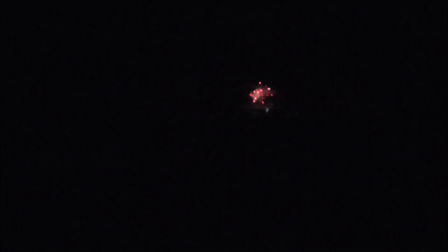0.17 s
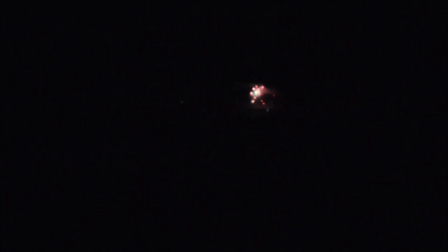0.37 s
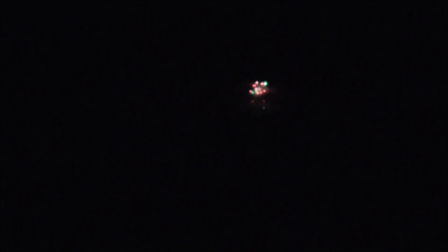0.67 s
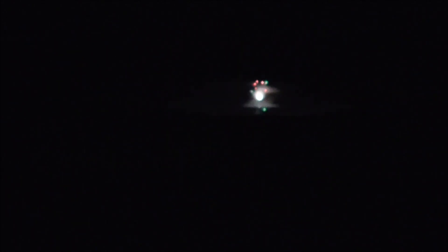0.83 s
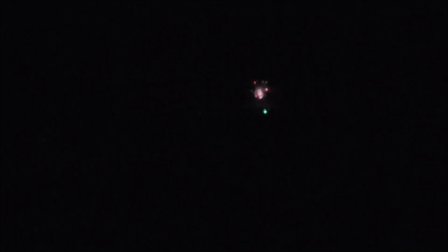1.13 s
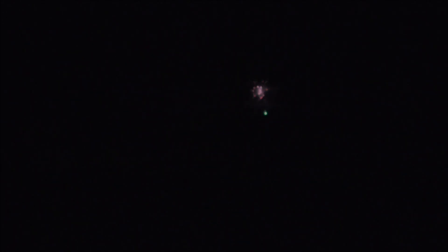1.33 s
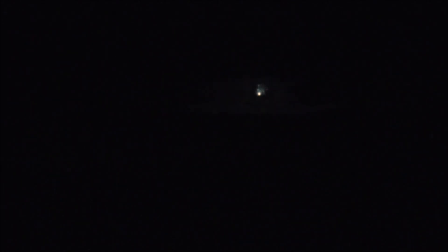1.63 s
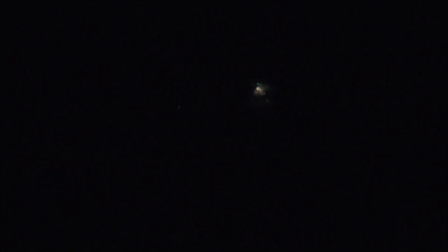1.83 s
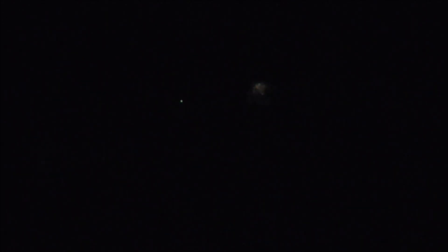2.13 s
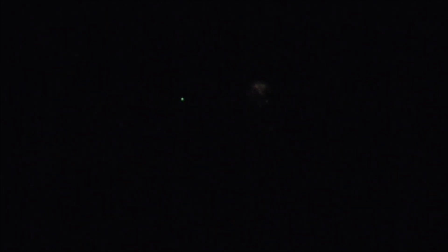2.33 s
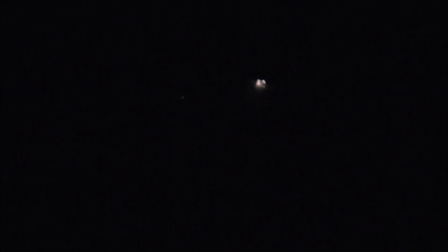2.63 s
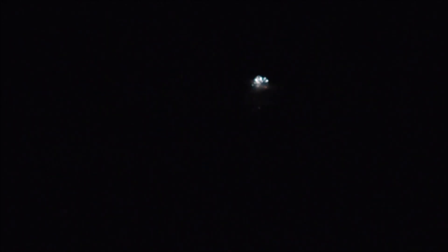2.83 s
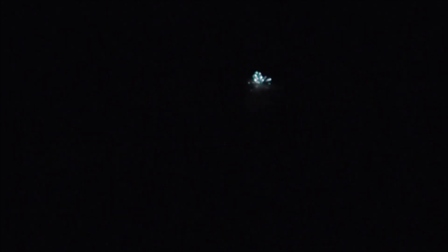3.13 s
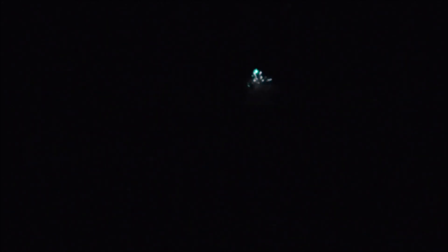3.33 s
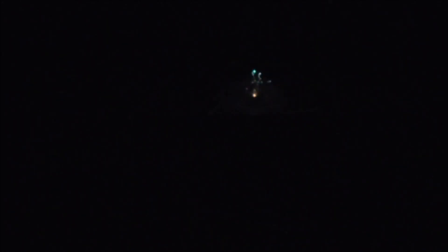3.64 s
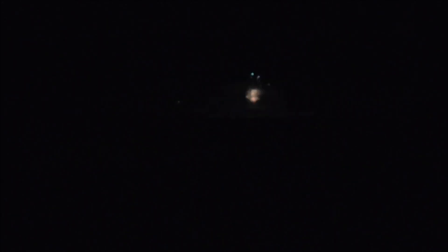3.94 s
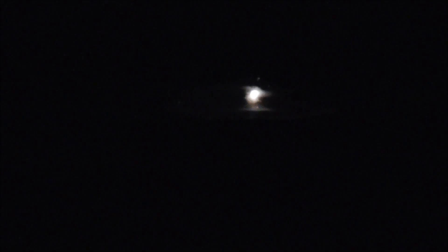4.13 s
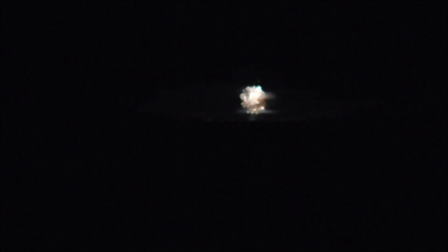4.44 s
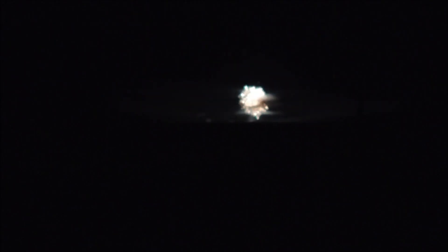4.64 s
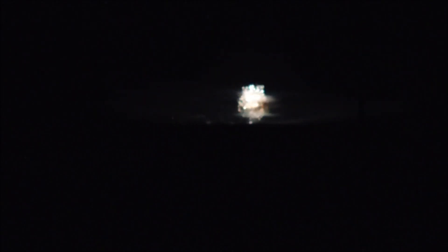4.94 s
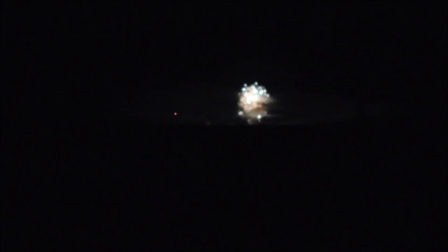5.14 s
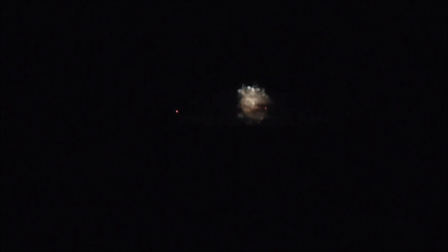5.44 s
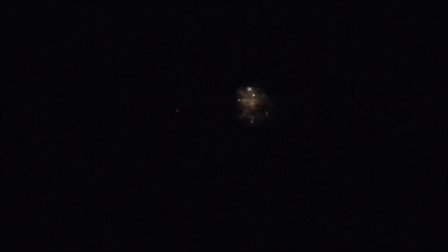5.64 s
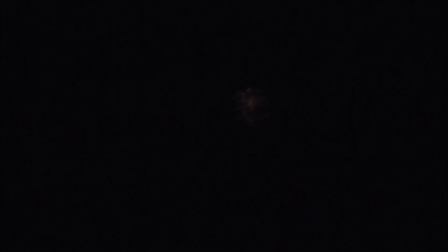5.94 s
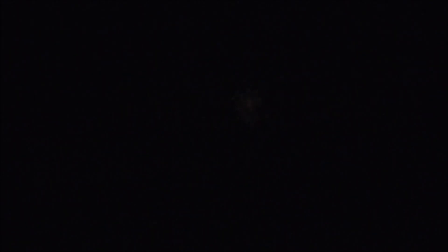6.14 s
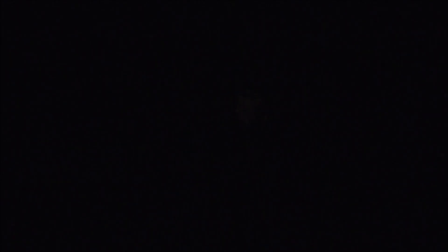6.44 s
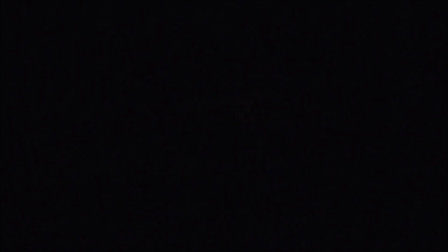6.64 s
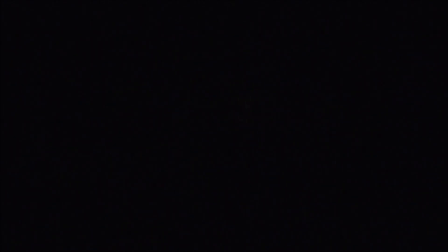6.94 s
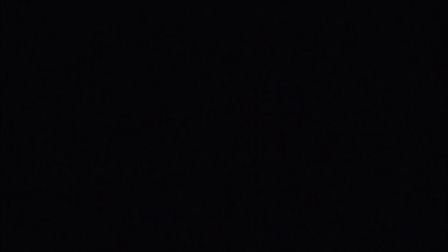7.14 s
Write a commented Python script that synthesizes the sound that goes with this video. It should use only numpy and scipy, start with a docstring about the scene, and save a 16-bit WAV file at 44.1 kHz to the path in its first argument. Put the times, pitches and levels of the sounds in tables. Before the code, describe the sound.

Many far-away fireworks pop and thump in an open night setting. The sound opens straight on a bang, then bursts come singly and in quick flurries, some sharper and a little to one side. A continuous muffled rumble with soft crackling joins them together, dips now and then, and grows fuller toward the close. The small stereo microphone gives thin deep bass, mild limiting and quiet hiss.

```python
"""Outdoors at night, far from a fireworks display, heard through a small stereo camera.
Each burst is a dull thud: a short low pulse with a deeper thump and a thin knock and snap, smeared by scatter.
Random small pops over noise, standing for their echoes, blend into a rumble that swells near the end.
Thin treble ticks ride on loud bangs. The loudest bangs meet a soft ceiling; the recorder's own hiss
sinks after them and creeps back."""
import sys
import numpy as np
from scipy import signal
from scipy.fft import rfft, irfft, next_fast_len
from scipy.io import wavfile
from scipy.ndimage import map_coordinates

SR = 44100
rng = np.random.default_rng(int(sys.argv[2]) if len(sys.argv) > 2 else 0)


def wrap_up_sound(samples):
    """Save the sound to the file named by the first command line argument, as 16-bit audio."""
    columns = np.atleast_2d(samples).T
    # keep every value between -1 and 1, then stretch to whole-number steps
    tamed = np.clip(columns, -1, 1)
    steps = np.round(tamed * 32767).astype(np.int16)
    wavfile.write(sys.argv[1], SR, steps)


N = 321472  # samples in the scene


def amp(db):
    """Decibel law: an amplitude ratio from a level in dB."""
    return 10 ** (np.asarray(db) / 20)


def unit(x):
    """Power normalisation: scale to an rms of 1."""
    return x / np.sqrt(np.mean(x ** 2) + 1e-20)


def along(points, hz):
    """Logarithmic pitch scale: interpolate (Hz, value) points along log frequency."""
    point_hz, values = np.transpose(points)
    return np.interp(np.log(hz + 1), np.log(point_hz + 1), values)


def curves(rows):
    """Envelope interpolation: one value per sample for each column after the time."""
    seconds, *columns = np.transpose(rows)
    return [np.interp(np.arange(N) / SR, seconds, column) for column in columns]


def wobble(rate):
    """Band-limited fluctuation: a smooth random curve with `rate` knots a second."""
    knots = rng.standard_normal(int(N * rate / SR) + 4)
    return map_coordinates(knots, [np.arange(N) * rate / SR])


def filtered(x, response):
    """Linear filtering: multiply the spectrum by a response of frequency."""
    length = next_fast_len(N + SR // 2)  # spare room keeps tails from wrapping round
    spectrum = rfft(x, length) * response(np.fft.rfftfreq(length, 1 / SR))
    return irfft(spectrum, length)[..., :N]


# Correlation of left and right. Each row: frequency in Hz, likeness (1 = identical, no unit).
LIKENESS = [(40, .9), (125, 1), (250, 0.97), (550, 0.89), (900, 0.79), (1600, .75), (2700, 0.21),
            (8000, 0.26)]


def spread(pair, spectrum):
    """Interchannel coherence: colour two signals as mid and side, giving a stereo pair of rms 1."""
    def mid_side_gains(hz):
        angle = np.arccos(np.clip(along(LIKENESS, hz), -1, 1)) / 2
        return amp(along(spectrum, hz)) * [np.cos(angle), np.sin(angle)]

    mid, side = filtered(pair, mid_side_gains)
    return unit(np.array([mid + side, mid - side]))


def pulse(t, hz, width, front):
    """Damped oscillation: swings under a bell centred on t = 0; front < 1 steepens the rise; the pitch sags."""
    u = t / width
    bell = np.exp(-(u / np.where(u < 0, front, 1)) ** 2 / 2)
    return bell * np.cos(2 * np.pi * hz * t * (1 - .06 * np.tanh(u)))


THUMP_DB, THUMP_HZ = -15, 170  # level against the thud
KNOCK_HZ, KNOCK_AFTER_MS = 1080, 0.65  # the knock and snap follow the peak
SNAP_HZ = 2700
GROUND_HZ = 70  # the ground echo cancels the lowest bass

# The single bursts. Each row: time of the peak in seconds, peak level in dB before shadow and bass loss,
# thud pitch in Hz, thud length in ms (two bell widths), knock level in dB (rms of a steady tone) and
# snap peak level in dB (both against the thud, before shadow), lag of left behind right in ms.
BURSTS = [(.003, -2.5, 295, 12, -7, -39, 0.019), (.0455, 4.5, 417, 2.3, -13, -40, .25),
          (0.0749, -1, 463, 2.3, -20.5, -36, .2), (.304, 2.5, 307, 2.3, -22.5, -39.5, 0.032),
          (0.3619, -5.5, 343, 4.2, -22.5, -39, 0.03), (0.3655, 2, 500, 1.2, -24.5, -35.5, 0.012),
          (0.5408, -7.5, 390, 3.5, -27, -61, 0.048), (0.5722, -8, 403, 2.5, -28, -50, 0),
          (.7052, -3.5, 304, 3.5, -18.5, -37, 0.016), (0.782, 2.5, 527, 3.3, -14.5, -28, .23),
          (0.8512, -2.5, 468, 2.1, -24, -55, .23), (1.2489, -4.5, 346, 2.8, -13, -38, 0.064),
          (1.45, -7.5, 445, 1.5, -14, -28, 0.021), (1.4541, 1.5, 239, 3.8, -27.5, -53, 0.067),
          (1.494, -13, 520, 4, -14.5, -50, 0.023), (1.511, -1.5, 330, 2.4, -16, -37, 0.096),
          (1.5171, 2, 404, 0.77, -33, -33.5, 0), (2.0268, 0.2, 384, 1.1, -19.5, -42.5, 0.038),
          (2.06, -8.5, 450, 2.1, -20, -63.5, 0), (2.0837, -6.5, 340, 5.6, -23, -64, 0.046),
          (2.0954, -9, 279, 8, -31, -58, 0.023), (2.1107, 0.5, 273, 3.6, -44, -59, 0.072),
          (2.1147, -4.5, 407, 0.8, -32, -61, 0), (2.1524, 5.5, 405, 1.76, -34, -35, 0.28),
          (2.2136, -6.5, 407, 4.9, -25, -49.5, 0.23), (2.2797, -7, 465, 1.8, -12.5, -29, 0.025),
          (2.3013, -6, 259, 14, -15, -30, 0.026), (2.3632, -6.5, 326, 10, -6, -44, 0.086),
          (2.3674, 2.5, 434, 1.4, -19, -32, 0), (2.429, -3.2, 467, 1.1, -42, -35, 0.08),
          (2.9433, -4, 410, 1.4, -12.5, -32.5, 0.05), (3.1846, -9.5, 410, 3.2, -40, -63.5, 0.029),
          (3.399, -2, 272, 3.85, -11.5, -34, 0.029), (3.4015, -3, 270, 3, -29, -51, 0.085),
          (3.439, 5, 475, 2.9, -11.5, -47, .25), (3.467, -10.5, 322, 2.9, -8, -36, 0),
          (3.473, -1.2, 445, 1.1, -30, -49, 0.032), (3.5178, -4.5, 520, 2.8, -19, -42, .23),
          (3.5616, -5, 440, 1.3, -12.5, -38, 0.022), (4.1685, -2, 490, 1.17, -27, -37.5, 0.043),
          (4.1728, -5, 320, 3.3, -21, -56, 0.091), (4.2237, -5, 380, 1.8, -25, -52, 0),
          (4.242, -5, 322, 2, -21.5, -55, 0), (4.248, 2, 320, 2, -23.5, -41.5, 0.043),
          (4.426, -9.5, 427, 1.7, -26, -52, 0.049), (4.7344, 4.5, 444, 2.4, -7.5, -44.5, 0.24),
          (4.7397, -10.5, 324, 1, -28, -33, 0), (4.817, -5, 460, 2.4, -24, -45, 0.26),
          (4.8283, -6.5, 440, 1.5, -11.5, -29, 0.0066), (4.8809, -2.9, 387, 1.2, -13.5, -27.5, 0.031),
          (4.9068, -6.5, 428, 2.1, -8.5, -47, 0.023), (4.9804, -2.5, 418, 0.57, -17.5, -27, 0.009),
          (4.9979, -2, 403, 1.8, -18, -39, 0), (5.0045, -8.5, 315, 5.9, -15, -46, 0.086),
          (5.005, -15, 410, 2.1, -3, -43, 0.022), (5.028, -5.5, 426, 0.7, -20, -52, 0),
          (5.066, -14, 470, 4.3, -18, -48, 0), (5.103, -6, 345, 2, -10.5, -33, 0.023),
          (5.1357, -4.5, 381, 3.8, -10, -42, 0), (5.154, -4, 450, 1, -16.5, -51, 0),
          (5.1887, -8.5, 350, 2.5, -8.5, -52.5, 0.013), (5.3196, -12, 400, 1.4, -23, -57, 0.059),
          (5.7106, -13.5, 430, 2.5, -29, -58.5, 0.076), (5.7575, -9.5, 428, 3.3, -36, -58, 0.056),
          (5.9582, -8.5, 380, 5, -32, -54, 0.075), (6.127, -1.5, 450, 1.5, -19, -38, 0),
          (6.1315, -2.5, 488, 0.76, -34, -53, 0), (6.1724, 0, 440, 1.2, -21, -46, 0.024),
          (6.182, -2, 241, 5.3, -30, -52, 0.028), (6.1999, -6.5, 308, 2.9, -17.5, -61, 0.051),
          (6.206, -0.5, 554, 1.5, -19.5, -49, 0.038), (6.227, -5, 260, 5.8, -24, -52, 0),
          (6.241, -7, 310, 2.8, -14, -53, 0.015), (6.2484, -2, 366, 2.8, -22, -53, 0),
          (6.282, -3, 403, 1.4, -25, -56, 0.076), (6.2899, -5.5, 300, 3.6, -31, -53, 0.035),
          (6.3254, -3.5, 313, 4.9, -14, -37.5, 0), (6.363, -4, 440, 1.4, -13, -37, 0),
          (6.3858, -4.5, 333, 4.7, -8, -28, 0.036), (6.3929, 2.3, 420, 1.2, -25, -36, 0),
          (6.4658, -4.5, 470, 0.88, -26, -41, 0), (6.4721, -1, 400, 1.1, -19, -44, 0),
          (6.5415, -6, 318, 3, -14, -51, 0.025), (6.5451, -0.5, 385, 2.2, -30, -36, 0.03),
          (6.6399, -4, 430, 1.3, -16.5, -37, 0.013), (6.7024, -2.5, 336, 1.9, -21, -40, 0),
          (6.727, -7.5, 503, 2.2, -21, -58, 0), (6.7521, 0.5, 419, 1.2, -20, -37.5, 0),
          (6.7648, -7.5, 518, 2.1, -31.5, -53, 0.054), (6.895, -12.5, 480, 21, -21, -56, 0.039),
          (6.9248, -15.5, 437, 1.6, -15, -49, 0), (6.965, -6.5, 407, 1.2, -23, -53, 0),
          (7.027, -9, 372, 3.3, -18.5, -54, 0), (7.0417, -10, 355, 1.1, -19, -44, 0),
          (7.1468, -22, 476, 1.8, -25, -41, 0.031), (7.2344, -9, 516, 5.7, -29, -35.5, 0)]


def bangs():
    """Superposition of pulses and multipath scattering: thud, thump, knock and snap blurred by scattered paths."""
    lead = SR // 50  # samples kept before each peak
    t = (np.arange(3 * lead) - lead) / SR
    out = np.zeros((2, N + SR))
    scatter_noise = rng.standard_normal((len(BURSTS), len(t)))
    for row, noise in zip(BURSTS, scatter_noise):
        s, db, hz, ms, knock_db, snap_db, lag_ms = row
        # the far port hears it later and weaker, most of all in the treble
        at = t - np.array([[1], [-1]]) * lag_ms / 2000
        shadow_db = np.array([[-1], [1]]) * 3.5 * lag_ms
        near = abs(lag_ms) > .12  # the launchers at the side start abruptly
        front = .55 if near else .9

        thud = -pulse(at, hz, .5 * ms / 1000, front)
        thump = amp(THUMP_DB) * pulse(at, THUMP_HZ, 0.0052, 0.53)
        edge = at - KNOCK_AFTER_MS / 1000
        knock = -amp(knock_db + shadow_db) * np.sqrt(2) * pulse(edge, KNOCK_HZ, .0004, .9)
        snap = -amp(snap_db + 4 * shadow_db) * pulse(edge, SNAP_HZ, 0.00012, .9)

        # seconds for the scatter to fall 60 dB before and after the main path
        smear = np.where(t < 0, .004 if near else .03, .035)
        scatter = amp(-27 - 60 * np.abs(t) / smear) * noise
        scatter[lead] = 1  # the main path
        wave = signal.fftconvolve(thud + thump + knock + snap, scatter[None], axes=1)
        wave = wave[:, lead:][:, :len(t)]
        out[:, round(s * SR):][:, :len(t)] += amp(db + shadow_db) * wave / np.abs(wave).max()
    return filtered(out[:, lead:][:, :N], lambda hz: (1j * hz / (GROUND_HZ + 1j * hz)) ** 2)


SIZZLE_DB, SIZZLE_GROWS = -23.5, 1.15  # against the average crackle; its swings in dB over the crackle's

# Spectra of the rumble, low to high. Each row: frequency in Hz, relative level in dB per Hz.
BODY = [(15, -50), (25, -26.5), (45, -21), (100, -16), (170, -9.5), (240, 0.5), (340, -1), (560, -1),
        (700, -6.5), (870, -16.5), (1300, -40), (2000, -120)]
CRACKLE = [(400, -120), (700, -9.5), (900, 3), (1300, 0.5), (1600, -14), (2000, -43.5), (3000, -120)]
SIZZLE = [(1000, -120), (1500, -9), (1900, 9.5), (2300, 1), (3000, -11.5), (4500, -38), (7000, -120)]
# Envelope of the rumble. Each row: time in seconds, body level in dB, crackle level in dB, before the surge.
RUMBLE = [(0.0, -22.5, -38.5), (0.49, -21, -37.5), (1.28, -27, -44), (1.72, -20, -37.5),
          (2.05, -21.5, -41.5), (2.21, -21.5, -36.5), (2.39, -21.5, -37.5), (3.37, -25.5, -45),
          (3.55, -23.5, -40), (4.16, -27, -43.5), (4.32, -18.5, -36.5), (4.73, -26.5, -44),
          (5.07, -23.5, -39), (5.46, -24.5, -40), (5.95, -26, -47.5), (6.17, -22.5, -41.5),
          (6.31, -14, -32.5), (6.64, -20, -36.5), (6.96, -15.5, -31.5), (7.29, -20, -32)]


def barrage():
    """Shot noise in a diffuse field: one stream of random pops over a wash of echoes drives three colours."""
    body_db, crackle_db = curves(RUMBLE)
    average_db = crackle_db.mean()
    sizzle_db = average_db + SIZZLE_DB + SIZZLE_GROWS * (crackle_db - average_db)

    fired = rng.random((2, N)) < 260 / SR  # 260 pops a second on average in each stream
    size_db = 4.6 * rng.exponential(size=(2, N)).clip(0, 3.5)
    pops = unit(-fired.astype(float) * amp(size_db))
    wash = rng.standard_normal((3, 2, N))
    surge_db = .6 * wobble(14) + 1.5 * wobble(70)

    body = amp(body_db + surge_db) * spread(0.43 * pops + wash[0], BODY)
    crackle = amp(crackle_db + surge_db) * spread(0.47 * pops + wash[1], CRACKLE)
    sizzle = amp(sizzle_db + surge_db) * spread(0.065 * pops + wash[2], SIZZLE)
    return (body + crackle + sizzle) * amp([[-.3], [.3]])  # slightly to the right


TICK_GAP_S, TICK_T60_S = .0022, 0.0028  # about one swing of the thud; time to fall 60 dB

# Thin treble ticks on loud bangs. Each row: start in seconds, then the starting levels in dB of the first
# and second tick, which scale the noise before its treble filter.
TICK_PAIRS = [(0.0445, -28.5, -32), (.0725, -40, -43), (.301, -44.5, -35.5), (.3612, -30, -38),
              (0.3664, -45.5, -41), (0.702, -35.5, -35), (0.7812, -38.5, -26.5), (1.2446, -37, -40.5),
              (1.4501, -45.5, -58.5), (1.51, -40.5, -46.5), (1.5158, -38, -34.5), (2.1508, -35, -39.5),
              (2.2814, -44, -52.5), (2.365, -38.5, -34.5), (2.3667, -36, -48), (2.4268, -45.5, -54.5),
              (2.94, -32.5, -42.5), (3.4348, -35.5, -34), (3.4708, -44.5, -53.5), (3.5592, -37, -39),
              (4.2477, -43.5, -55), (4.7341, -32.5, -34), (4.826, -49, -35.5), (4.8798, -34, -42),
              (4.979, -42, -32.5), (5.1004, -49, -35), (5.1282, -45, -39), (6.1265, -43, -58.5),
              (6.2077, -43, -54.5), (6.387, -34.5, -46.5), (6.3922, -40.5, -42), (6.5412, -39, -41.5)]


def ticks():
    """Exponential decay of noise: each tick is a short spark of treble, and a second follows one swing later."""
    t = np.arange(SR // 100) / SR
    out = np.zeros((2, N + SR))
    noises = rng.standard_normal((len(TICK_PAIRS), 2, 3, len(t)))
    for (s, *pair_db), noise in zip(TICK_PAIRS, noises):
        for k, db in enumerate(pair_db):
            shared, separate = noise[k, 0], noise[k, 1:]
            spark = amp(db - 60 * t / TICK_T60_S) * (shared + 0.34 * separate)
            out[:, round((s + k * TICK_GAP_S) * SR):][:, :len(t)] += spark
    # the bass is removed and the lower treble leans forward
    return filtered(out[:, :N], lambda hz: hz ** 2 / (hz ** 2 + 1800 ** 2) * (1 + 2500 / (hz + 1500)))


HISS_DB, DUCK_DB = -65, 4  # level at rest before the band limit; deepest drop
DUCK_FROM, RECOVER_S = 0.55, 0.65  # peak amplitude that starts the drop; time constant of its control

# Spectrum of the recorder's hiss. Each row: frequency in Hz, relative level in dB per Hz.
SELF_NOISE = [(2000, -120), (3000, -2.5), (3800, 4), (5800, -5.5), (8000, 1.5), (10000, 3), (12500, 1.5),
              (15000, 1), (16500, -0.5)]


def hiss(loud):
    """Gain reduction with slow release: the recorder's own noise ducks after loud peaks and creeps back."""
    over = np.clip(np.abs(loud).max(axis=0) - DUCK_FROM, 0, None)
    keep = np.exp(-1 / (RECOVER_S * SR))
    pressure = signal.lfilter([1], [1, -keep], over) / 30  # leaky sum of the excess
    noise = spread(rng.standard_normal((2, N)), SELF_NOISE)
    return amp(HISS_DB - DUCK_DB * np.tanh(pressure)) * noise


def scene():
    """Superposition: single bursts over the rumble."""
    return bangs() + barrage()


MIC_LOW_HZ, TOP_HZ = 94.4, 15800  # corner of the bass roll-off; upper band limit
CEILING = .98  # amplitude


def record(dry):
    """Band limiting and saturation: bass roll-off, soft ceiling, ticks and hiss, then the upper limit."""
    thin = filtered(dry, lambda hz: (1j * hz / (MIC_LOW_HZ + 1j * hz)) ** 2)
    held = thin / (1 + np.abs(thin / CEILING) ** 5) ** (1 / 5)
    return filtered(held + ticks() + hiss(held), lambda hz: hz < TOP_HZ)


dry = scene()
out = record(dry)
wrap_up_sound(out)
```